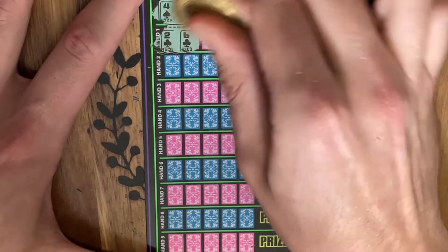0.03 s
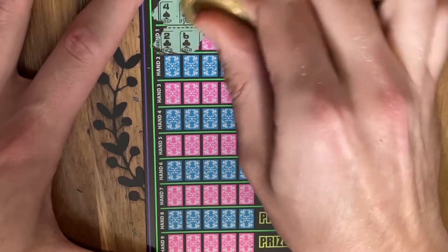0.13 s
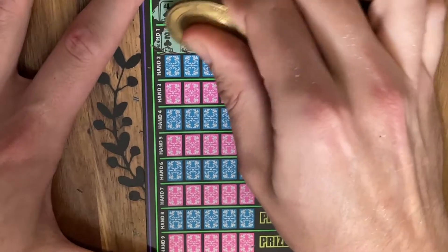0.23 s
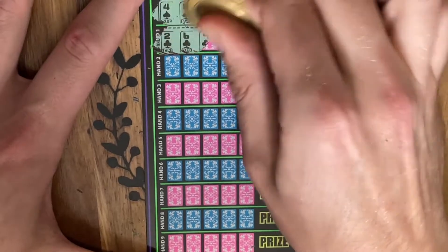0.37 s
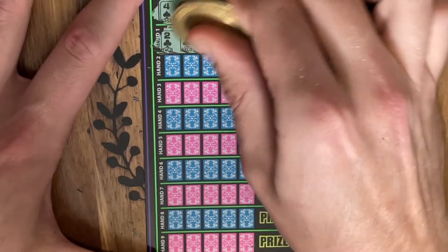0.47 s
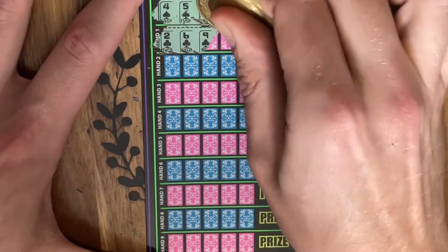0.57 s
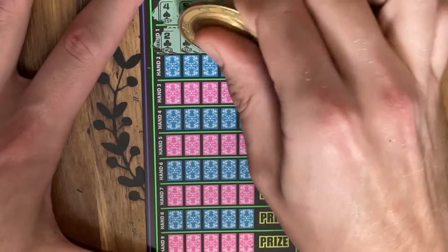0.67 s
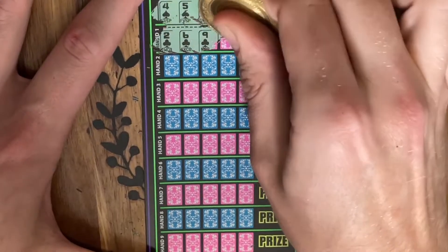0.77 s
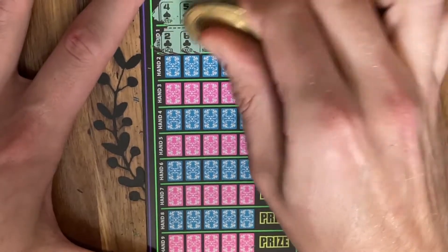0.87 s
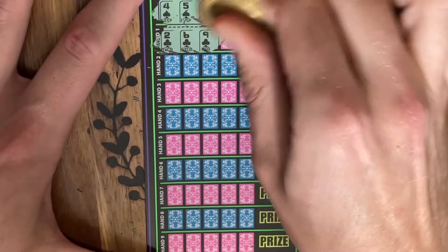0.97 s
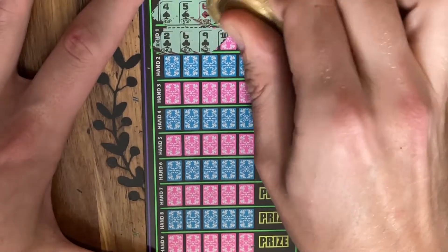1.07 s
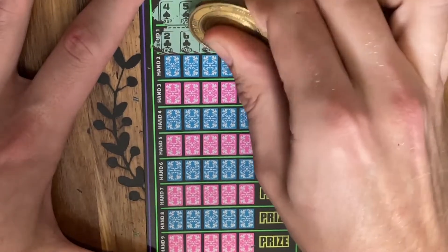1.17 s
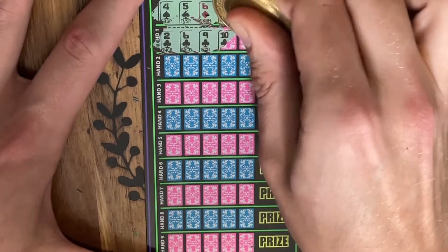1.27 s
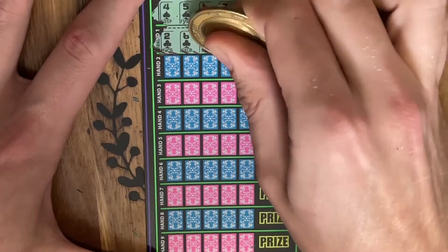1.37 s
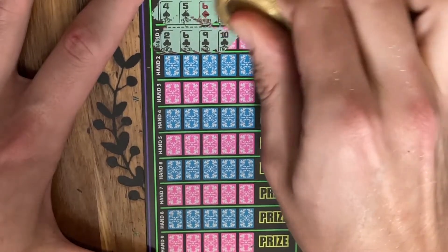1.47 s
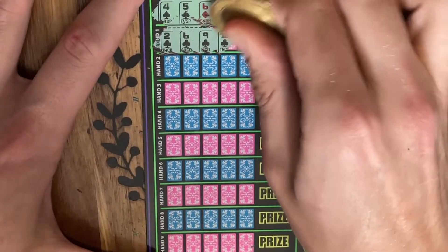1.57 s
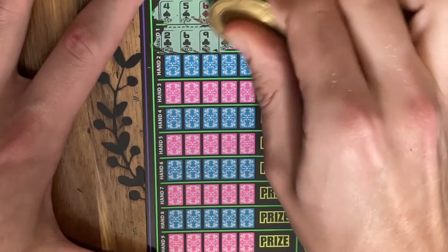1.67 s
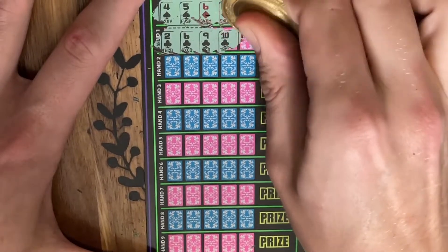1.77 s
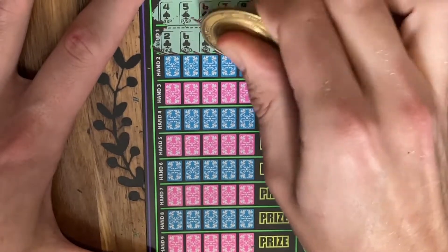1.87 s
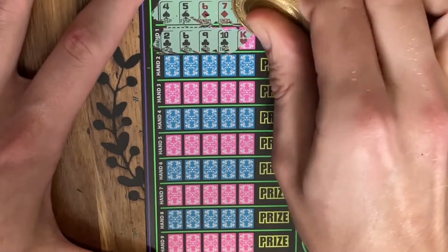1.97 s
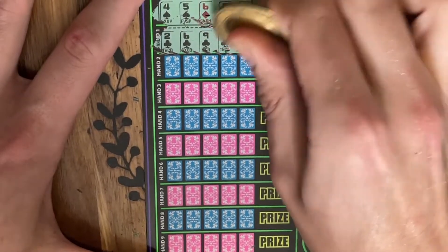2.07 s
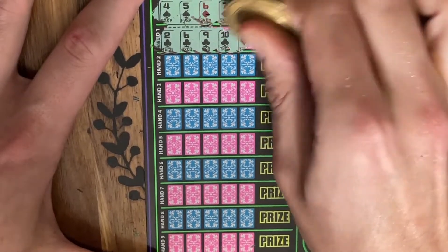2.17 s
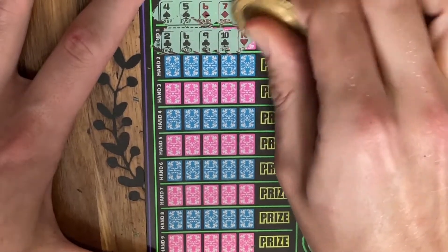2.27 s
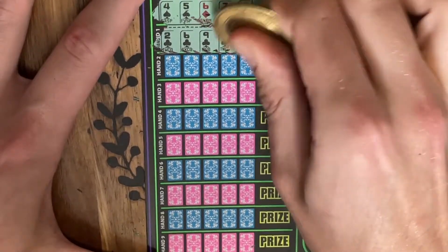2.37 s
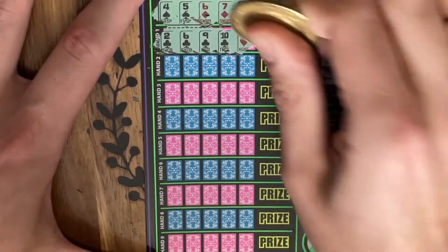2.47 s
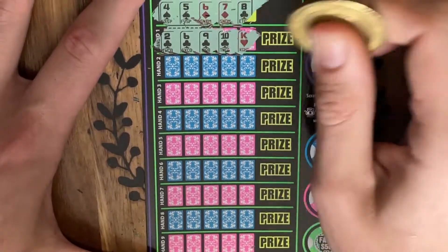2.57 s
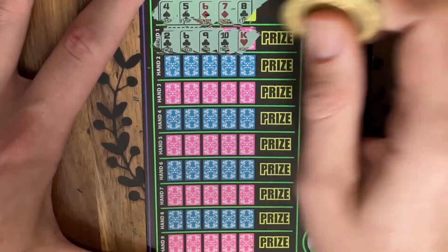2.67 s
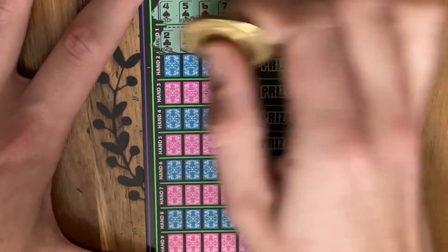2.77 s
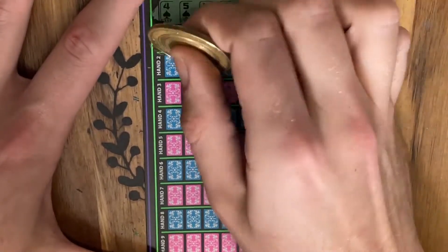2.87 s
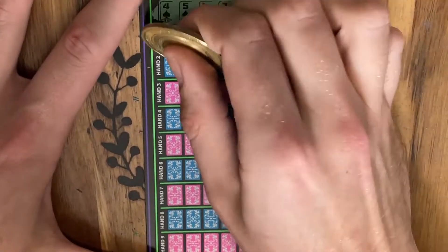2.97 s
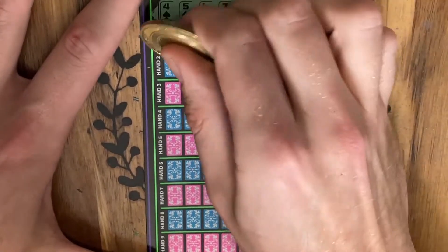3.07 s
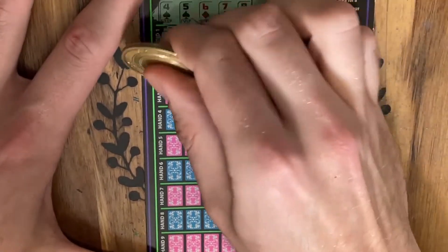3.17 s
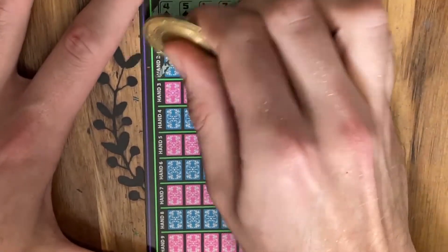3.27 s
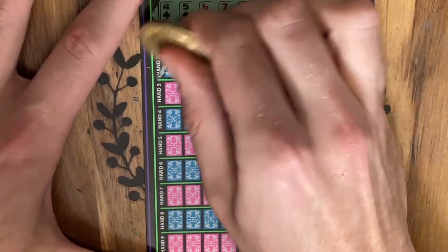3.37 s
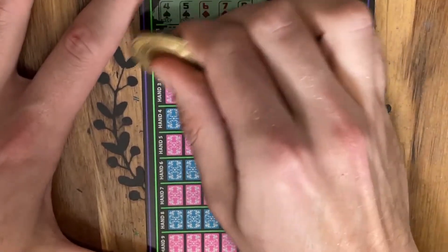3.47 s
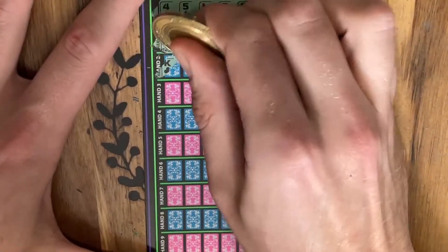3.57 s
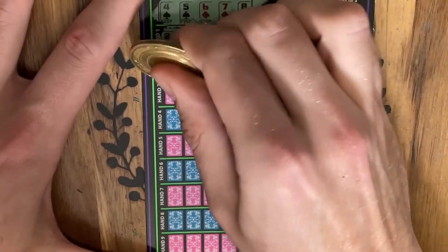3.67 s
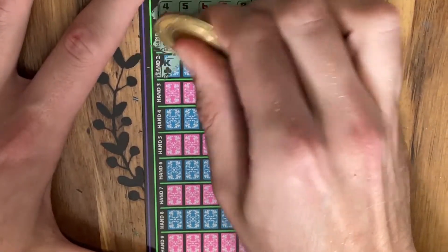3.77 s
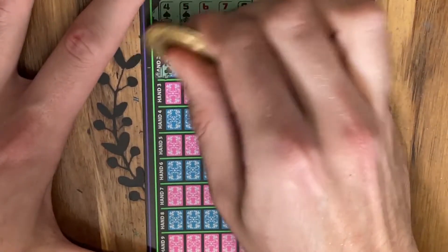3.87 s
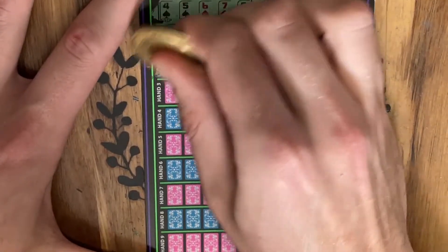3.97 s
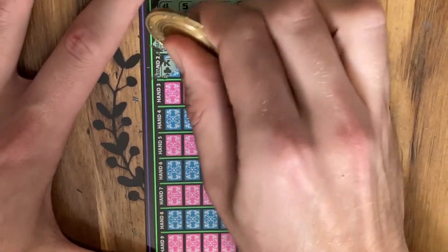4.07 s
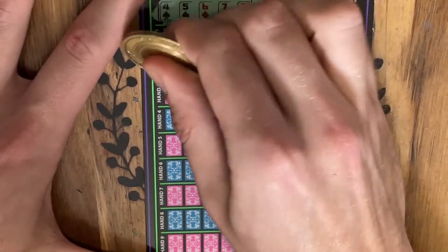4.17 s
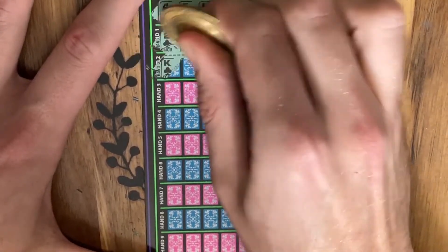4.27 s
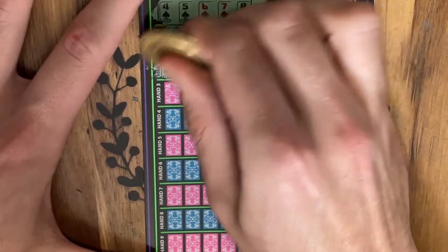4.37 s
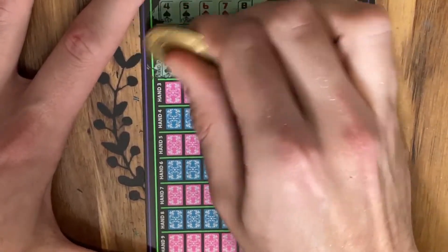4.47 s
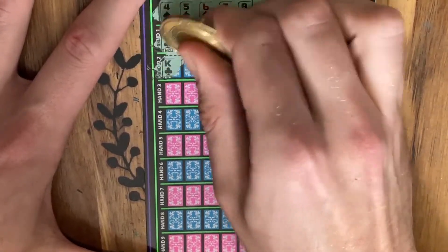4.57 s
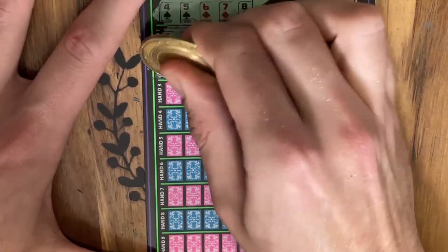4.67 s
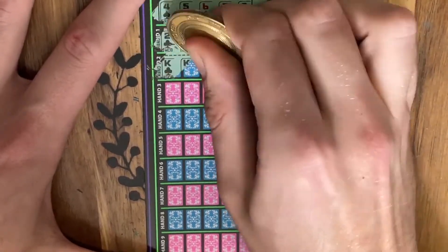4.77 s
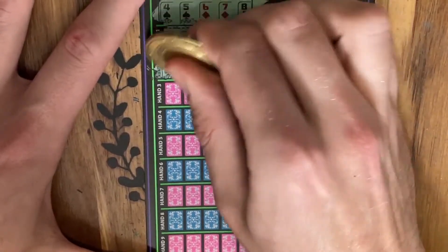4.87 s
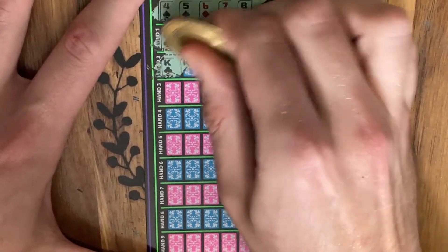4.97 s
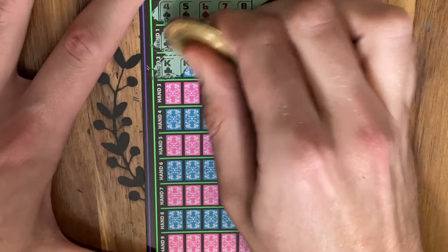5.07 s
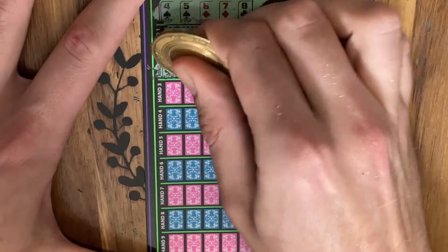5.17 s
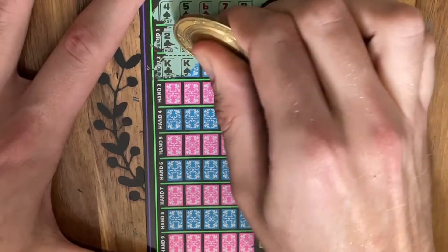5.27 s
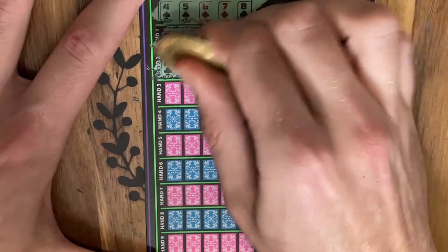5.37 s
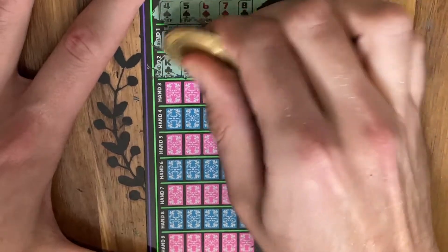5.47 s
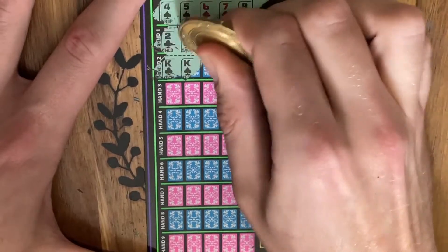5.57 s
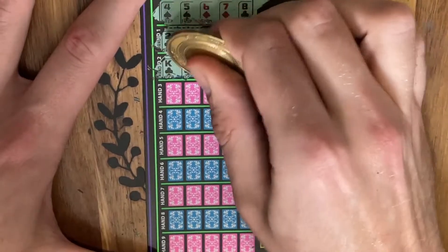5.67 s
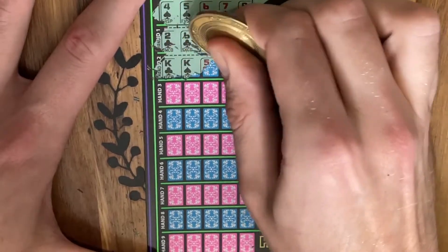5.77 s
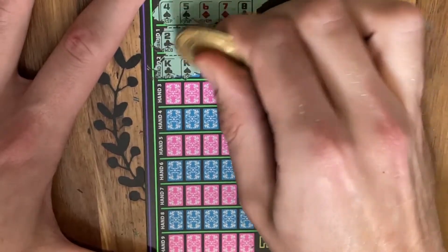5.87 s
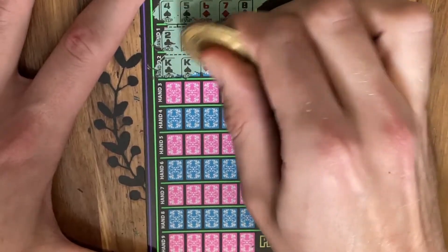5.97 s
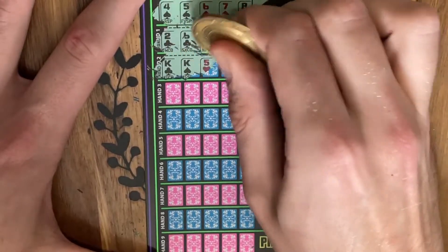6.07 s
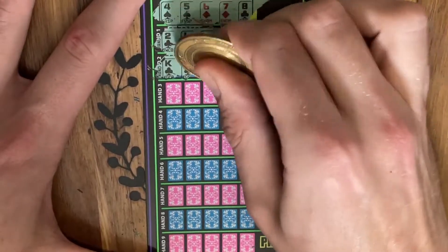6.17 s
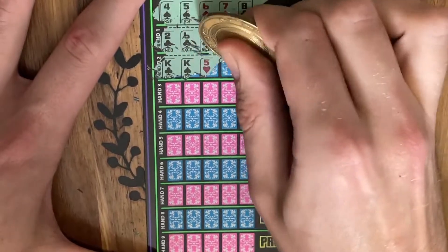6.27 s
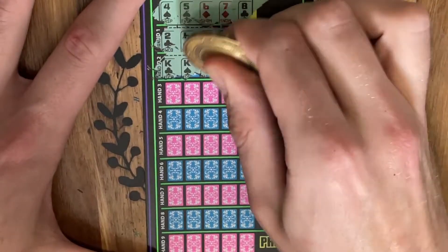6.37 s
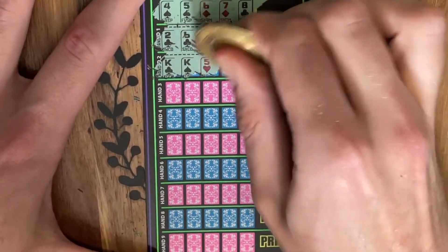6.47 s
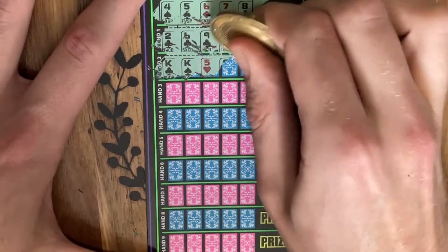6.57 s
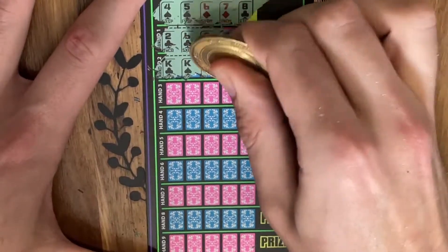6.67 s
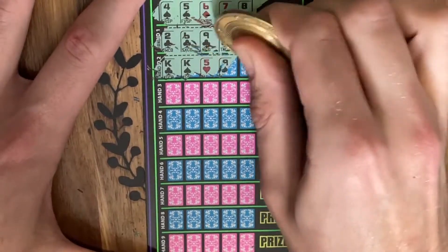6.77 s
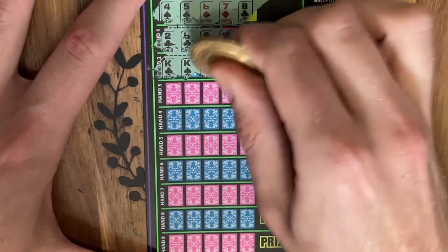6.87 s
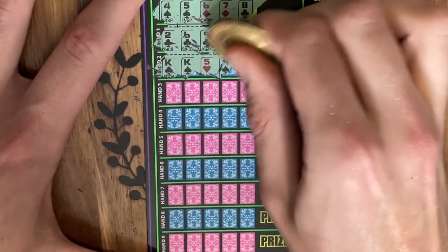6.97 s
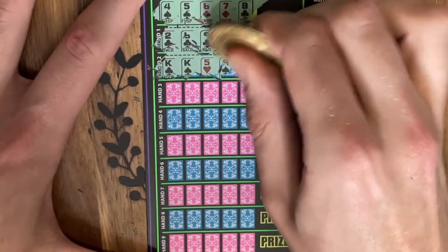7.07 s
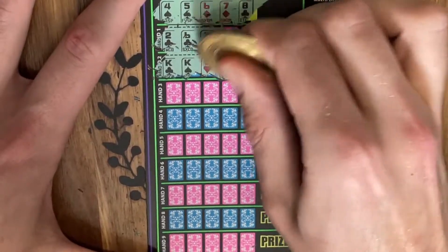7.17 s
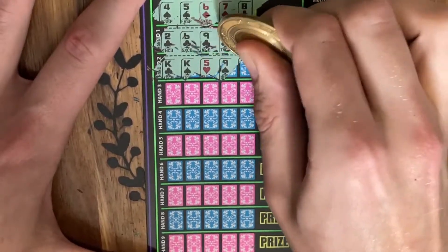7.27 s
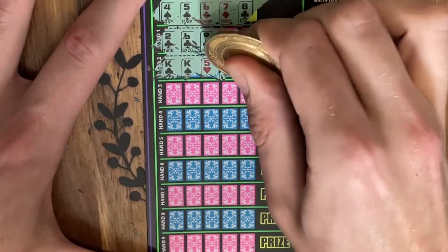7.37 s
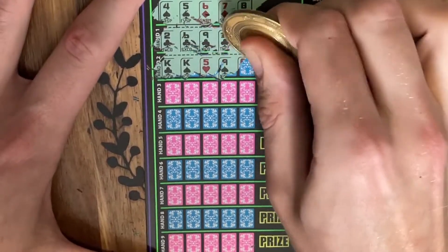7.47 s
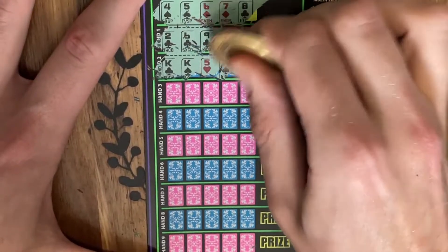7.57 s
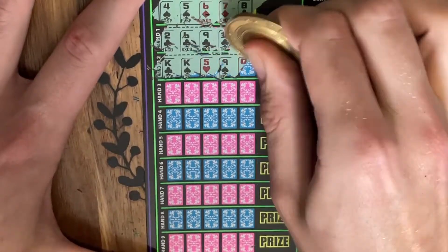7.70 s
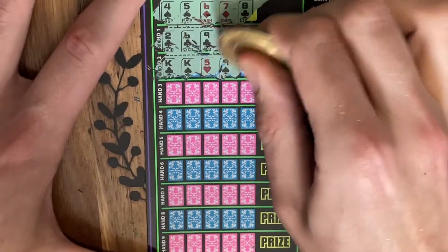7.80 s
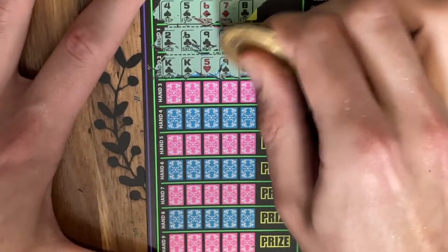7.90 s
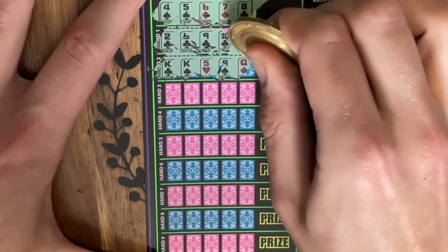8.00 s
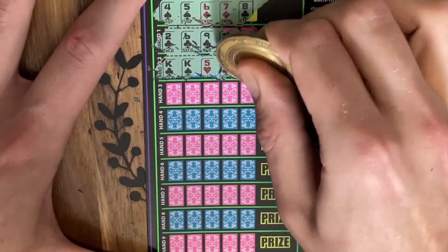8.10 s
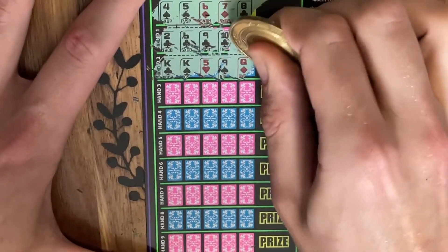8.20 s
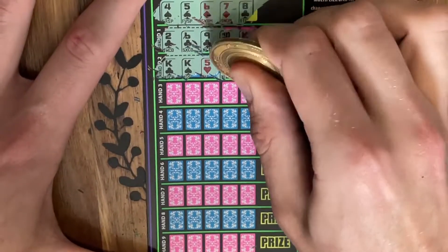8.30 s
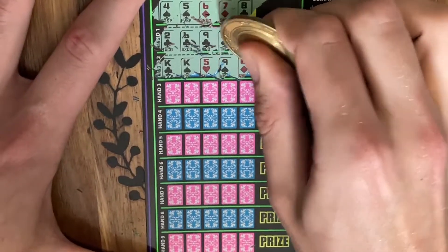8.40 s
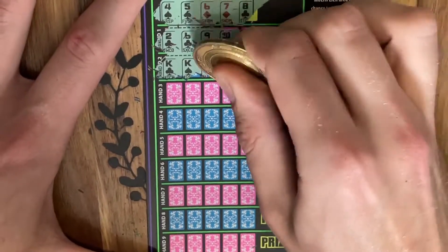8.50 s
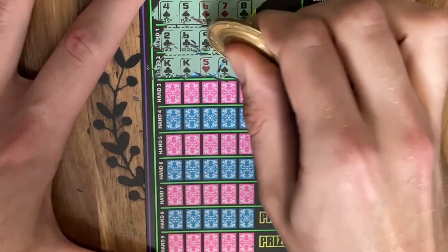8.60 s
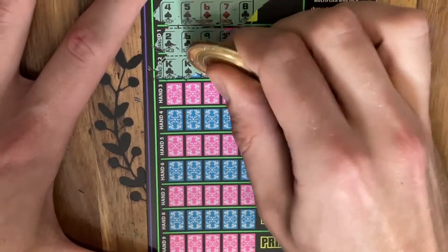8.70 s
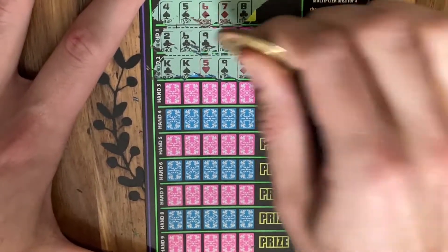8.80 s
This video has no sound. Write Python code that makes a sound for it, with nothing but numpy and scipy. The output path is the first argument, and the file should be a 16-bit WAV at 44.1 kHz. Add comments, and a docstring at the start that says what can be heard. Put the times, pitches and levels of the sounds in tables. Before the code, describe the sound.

Rapid to-and-fro coin scraping on card, about eight rasps a second, broken by a short pause with sharp ticks and a soft thud.

```python
"""A coin scratches the coating off a paper ticket on a wooden table, eight strokes a second, to and fro.
Random breaks stand for tiny flakes; this one force, with chatter and snags, rings table, coin and card.
The hand pauses once, sets the coin down and goes on; ticks of the rim are short cracks with a rustle.
Faint brushes and squeaks, a rumble from the hand, a short room tail and a steady hush lie around it,
all filtered noise, heard close by at two microphone ports in a quiet room."""
import sys
import numpy as np
from scipy import signal
from scipy.fft import rfft, irfft, next_fast_len
from scipy.io import wavfile
from scipy.ndimage import map_coordinates

SR = 44100
rng = np.random.default_rng(int(sys.argv[2]) if len(sys.argv) > 2 else 0)


def to_wav(s):
    """Save 16-bit WAV."""
    ch = np.atleast_2d(s).T  # columns
    pcm = np.round(np.clip(ch, -1, 1) * 32767)  # PCM
    wavfile.write(sys.argv[1], SR, pcm.astype(np.int16))


N = 389844  # samples in the whole scene
SIZE = 16384  # samples in one short event
T, HZ = np.arange(SIZE) / SR, np.fft.rfftfreq(SIZE, 1 / SR)

# tone of the card's rasp, one list for forth and one for back: (f/Hz, level/dB)
RASP_TONE = [
    [(700, -19), (1500, -13.5), (1800, -2.5), (2400, 1), (2780, -4), (3050, 4.5), (3350, -3.5),
     (3950, -7.5), (5500, -5), (6200, -10.5), (6700, -7.5), (7600, -7), (9000, -24), (14000, -45.5)],
    [(700, -14.5), (1500, -4.5), (1780, -1.5), (2400, 0.5), (2780, -5.5), (3100, -2.5), (3900, -7),
     (4350, -4.5), (4680, 3.5), (5000, -0.5), (6200, -6), (6700, -9), (9000, -16.5), (14000, -76.5)],
]
# tone of the crumbling coating: (f/Hz, level/dB)
FIZZ_TONE = [(6000, -22), (7900, -3.5), (8250, 2), (8700, -1), (9500, -5), (10250, 1), (10750, -6),
             (11300, -12), (11800, -6.5), (12600, -27), (14000, -36)]


def amp(db):
    """Turn decibels into a gain."""
    return 10 ** (np.asarray(db) / 20)


def unit(x):
    """Scale a sound to an rms of 1."""
    return x / np.sqrt(np.mean(x ** 2) + 1e-20)


def along(points, hz):
    """Read (f/Hz, value) points in between, on a log frequency axis."""
    f, v = np.transpose(points)
    return np.interp(np.log(hz + 1), np.log(f + 1), v)


def wobble(rate):
    """A smooth random curve as long as one event, with rate knots a second."""
    return map_coordinates(rng.standard_normal(SIZE // 8), [T * rate], mode="wrap")


def colour(points):
    """Response with the gain of the (f/Hz, level/dB) points that never sounds before its cause."""
    cepstrum = irfft(np.log(amp(along(points, HZ))))
    # folding the second half onto the first makes the response causal
    cepstrum[1:SIZE // 2] *= 2
    cepstrum[SIZE // 2 + 1:] = 0
    return np.exp(rfft(cepstrum))


def modes(rows):
    """Response of a body that rings at several resonances: (f/Hz, width/Hz, level/dB)."""
    total = 0
    for k, (centre, width, db) in enumerate(rows):
        damping = 1j * HZ * width
        sign = (-1) ** k  # neighbours take opposite signs
        total = total + sign * amp(db) * damping / (centre * centre - HZ * HZ + damping)
    return total


def through(force, response):
    """Play a short force through a body."""
    return irfft(rfft(force) * response)


def filtered(x, response):
    """Filter a whole track with a function of frequency."""
    m = next_fast_len(N + SR // 2)
    spectrum = rfft(x, m) * response(np.fft.rfftfreq(m, 1 / SR))
    return irfft(spectrum, m)[..., :N]


def add(track, s, sound):
    """Mix a sound into the track at time s, cutting off what falls outside."""
    i = round(s * SR)
    sound = sound[..., max(-i, 0):max(N - i, 0)]
    track[..., max(i, 0):][..., :sound.shape[-1]] += sound


def ports(x):
    """Shift the phase between the ports by pitch: over most of the treble the left port leads."""
    # head start of the left port, negative where it lags: (f/Hz, phase/rad)
    lead = [(0, 0), (300, 0), (520, -.4), (1400, -.15), (2700, .7), (4050, .7), (4650, 1.9), (5170, 4.9),
            (5700, 6.2), (6200, 6.5), (8350, 9), (9560, 9.6), (12300, 12.6)]
    return filtered(x, lambda hz: np.exp(1j * np.outer([.5, -.5], along(lead, hz))))


def air():
    """Steady hush of the room: coloured noise, mostly shared by both ports."""
    # tone of the hush: (f/Hz, level/dB)
    hush_tone = [(12, -33), (20, -16), (71, 0), (166, -18.5), (195, -7), (235, -5.5), (277, -18.5),
                 (439, -25), (517, -21.5), (819, -28), (1800, -32), (4770, -34.5), (13000, -40),
                 (16900, -89.5), (22000, -120)]
    # noise of each port alone, against the shared noise: (f/Hz, level/dB)
    apart = [(30, -23.5), (100, -16), (400, 0.5), (3000, -7), (12000, -7)]
    hush_db = -71.5
    shared = ports(rng.standard_normal(N))
    alone = filtered(rng.standard_normal((2, N)), lambda hz: amp(along(apart, hz)))
    return amp(hush_db) * unit(filtered(shared + alone, lambda hz: amp(along(hush_tone, hz))))


def room(x):
    """A short diffuse tail of fading noise, different at each port, where each pitch has its own decay."""
    # time to fade by 60 dB: (f/Hz, t/s)
    decay = [(200, 0.56), (1200, 0.37), (5000, 0.069), (12000, 0.051)]
    # strength of the tail: (f/Hz, level/dB)
    wet_level = [(200, -10.5), (1300, -23), (4000, -10.5), (12000, -20)]
    hz, t, z = signal.stft(rng.standard_normal((2, SR // 3)), SR, nperseg=256)
    fade = amp(-60 * t / along(decay, hz)[:, None])
    tail = signal.istft(z * fade, SR, nperseg=256)[1]
    wet = signal.fftconvolve(x[None], tail / np.linalg.norm(tail[0]), axes=1)[:, :N]
    return filtered(wet, lambda hz: amp(along(wet_level, hz)))


def hand():
    """The rocking hand makes the table rumble: low noise that swells and sinks."""
    # tone of the rumble: (f/Hz, level/dB)
    rumble_tone = [(20, -19), (60, -9.5), (92, 3), (135, -1.5), (250, -9.5), (400, -7.5), (900, -48)]
    # loudness of the rumble: (t/s, level/dB)
    rumble_level = [(0.0, -66.5), (1.08, -68), (1.92, -70), (2.11, -59.5), (2.26, -72), (2.31, -62.5),
                    (2.8, -79.5), (3.67, -60.5), (4.31, -68.5), (4.38, -58.5), (4.46, -71), (4.7, -67.5),
                    (6.8, -70.5), (6.89, -58), (6.97, -67), (8.17, -66.5), (8.49, -61.5), (8.84, -77)]
    rumble = unit(filtered(rng.standard_normal(N), lambda hz: amp(along(rumble_tone, hz))))
    return rumble * amp(np.interp(np.arange(N) / SR, *np.transpose(rumble_level)))


def squeaks():
    """A fingertip slipping on the card excites one narrow resonance."""
    # faint squeaks: (middle t/s, width t/s, f/Hz, level/dB)
    slips = [(3.062, .025, 2230, -84), (7.522, 0.02, 2070, -65)]
    out, lead_in = np.zeros(N), .1  # s
    for s, width, hz, db in slips:
        tone = unit(through(rng.standard_normal(SIZE), modes([(hz, 260, 0)]) ** 2))
        swell = np.exp(-((T - lead_in) / width) ** 2)
        add(out, s - lead_in, amp(db) * tone * swell)
    return out


def taps():
    """Sharp ticks of the rim with a short rustle of card, and the soft thud with which the coin lands."""
    # light taps of coin and card: (t/s, level/dB)
    ticks = [(2.4545, -43), (2.815, -47), (2.9605, -56), (2.9794, -32.5), (3.5634, -46), (3.8633, -52),
             (3.9673, -49), (4.061, -39), (4.079, -46), (4.2787, -40.5), (6.5373, -29), (8.107, -45),
             (8.136, -40), (8.4346, -40.5), (8.6316, -44)]
    # the coin is pressed down on the table: (t/s, level/dB)
    landings = [(2.984, -41)]
    # tone of the rim's click: (f/Hz, level/dB)
    click_tone = [(200, -24), (1500, 3), (4000, 3.5), (7000, 18), (10000, 19.5), (14000, -15)]
    # tone of the thud: (f/Hz, level/dB)
    thud_tone = [(40, -20.5), (120, -3), (330, 5), (800, 1), (1400, -8), (3000, -24.5)]
    out = np.zeros(N)
    for s, db in ticks:
        crack = through(rng.standard_normal(SIZE) * amp(-60 * T / .005), colour(click_tone))
        rustle_body = colour(FIZZ_TONE) + 0.41 * colour(RASP_TONE[0])
        rustle = through(rng.standard_normal(SIZE) * amp(-60 * T / 0.088), rustle_body)
        tick = crack / np.abs(crack).max() + amp(-16.5) * rustle / np.abs(rustle).max()
        add(out, s, amp(db) * tick)
    for s, db in landings:
        fade = amp(-60 * T / .035) + amp(-5.5) * amp(-60 * T / 0.2)  # a quick and a slow part
        thud = through(rng.standard_normal(SIZE) * fade, colour(thud_tone))
        add(out, s, amp(db) * thud / np.abs(thud).max())
    return out


def slide(t, length, rise, fall, arch_db):
    """Force over one stroke: it sets in, arches with the speed of the coin and lets go."""
    gate = (1 + np.tanh(t / rise)) * (1 + np.tanh((length - t) / fall)) / 4
    return gate * amp(-arch_db * np.minimum((2 * t / length - 1) ** 2, 2))


def flakes(rate, spread_db, smooth):
    """Tiny breaks of uneven size, rate a second, over the smooth hiss of sliding."""
    happens = rng.random(SIZE) < rate / SR
    size = rng.standard_normal(SIZE) * amp(spread_db * (2 * rng.random(SIZE) - 1))
    return unit(happens * size) + smooth * rng.standard_normal(SIZE)


def brushes():
    """With no weight on it the lifted coin stirs only the surface of the card."""
    # light touches: (start t/s, end t/s, level/dB)
    touches = [(2.558, 2.592, -69.5), (2.768, 2.826, -62.5), (8.805, 8.843, -69)]
    out, lead_in = np.zeros(N), .05  # s
    card = colour(RASP_TONE[1]) * (1 + modes([(7050, 760, 1.5)])) + 0.88 * colour(FIZZ_TONE)
    for start, end, db in touches:
        hiss = unit(through(flakes(rate=3000, spread_db=4, smooth=.4), card))
        touch = slide(T - lead_in, end - start, rise=0.0042, fall=0.012, arch_db=3)
        add(out, start - lead_in, amp(db) * hiss * touch)
    return out


def reflections(t60):
    """Response of a brief cluster of reflections, of unit energy."""
    cluster = rng.standard_normal(SIZE) * amp(-60 * T / t60) * (1 - np.exp(-T / 0.00033))
    return rfft(cluster / np.linalg.norm(cluster))


def snagging(t, start, length):
    """The edge catches and tears free: short bumps of extra force."""
    # snags, with the extra force before each body takes its share: (t/s, level/dB)
    catches = [(0.503, 7), (.538, 11.5), (1.263, 16.5), (1.847, 5), (1.961, 8), (1.974, 14.5), (2.081, 9),
               (2.207, 7), (3.794, 7), (3.889, 9), (4.029, 14), (4.277, 15), (4.506, 4), (4.766, 7.5),
               (6.536, 13.5), (6.993, 9.5), (7.483, 17.5)]
    gain = 1
    for s, db in catches:
        if abs(s - start) < length * 2:
            gain = gain + (amp(db) - 1) * np.exp(-((t + start - s) / 0.0028) ** 2)
    return gain


def cushion():
    """The paper softens the force on the heavy bodies, table and coin."""
    return 1 / (1 + 1j * HZ / 5000) ** 2


def coin_body():
    """Coin pinched in the fingers: the grip, and so each resonance, shifts a little every stroke."""
    # resonances of the held coin: (f/Hz, width/Hz, level/dB)
    coin_modes = [(1171.4, 59, -9.5), (1349.4, 99, 0), (1455.5, 116, 0), (1554, 136, -6)]
    grip = 1 + 0.014 * rng.standard_normal(len(coin_modes))
    return cushion() * modes([(hz * g, w, db) for (hz, w, db), g in zip(coin_modes, grip)])


def table_body(boom_db):
    """Table top: a slow swing and higher modes, favoured differently at each spot."""
    # slower swing, before the boom gain: (f/Hz, width/Hz, level/dB)
    boom_modes = [(318.7, 53, -4.5), (397.5, 56, -4), (468, 43, -8.5)]
    # higher modes: (f/Hz, width/Hz, level/dB)
    top_modes = [(601, 45.3, -3.5), (804, 44, 3), (905, 94, -4.5), (1040, 73, -3.5)]
    spot_db = 2.5  # typical random change of each mode
    top = [(hz, w, db + boom_db) for hz, w, db in boom_modes] + top_modes
    return cushion() * modes([(hz, w, db + spot_db * rng.standard_normal()) for hz, w, db in top])


def edge_ring(back, right):
    """Resonance of the coin's edge, blended from the left to the right end of a row."""
    # each pair is (forth, back)
    left_hz, right_hz = (5430, 5600), (6420, 6780)
    left_db, right_db = (8, -10), (16, 7.5)
    tilt = 1 + 0.037 * rng.standard_normal()  # the ring shifts from stroke to stroke
    at_left = modes([(left_hz[back] * tilt, 550, left_db[back])])
    at_right = modes([(right_hz[back] * tilt, 550, right_db[back])])
    return (1 - right) * at_left + right * at_right


def scratching():
    """Every stroke drives table, coin and card with the same stream of breaking flakes."""
    # strokes, forth and back in turn, with the rasp's level and the growth of the pressure:
    # (start t/s, end t/s, level/dB, growth/dB)
    strokes = [(.018, .081, -49, 4), (.146, .2, -51, -0.5), (.256, .319, -50.5, 0), (.378, .434, -56, 3),
               (.476, .545, -51.5, -4.5), (.607, .661, -52.5, 0), (.719, .787, -52, -0.5),
               (.85, .902, -53, -3), (.953, 1.024, -50.5, 4.5), (1.092, 1.152, -53.5, -0.5),
               (1.207, 1.26, -52, 4.5), (1.325, 1.386, -52, 1), (1.435, 1.497, -49.5, 2.5),
               (1.569, 1.62, -54, -4), (1.682, 1.737, -52.5, 0), (1.803, 1.865, -52, 0),
               (1.912, 1.97, -47, 0), (2.043, 2.104, -50.5, 0), (2.158, 2.223, -52, 0),
               (2.287, 2.339, -52, 0), (2.384, 2.433, -70.5, -4), (3.103, 3.171, -52.5, -3.5),
               (3.235, 3.299, -51.5, -6.5), (3.375, 3.433, -55.5, -3.5), (3.483, 3.542, -48.5, 3),
               (3.608, 3.679, -52.5, -3), (3.729, 3.805, -51, -3.5), (3.858, 3.917, -61, 3.5),
               (3.971, 4.043, -53.5, -4), (4.112, 4.167, -51.5, 1), (4.225, 4.298, -63, -2),
               (4.348, 4.407, -55, 2), (4.467, 4.541, -51.5, 1), (4.602, 4.653, -52, -0.5),
               (4.715, 4.775, -49.5, 6), (4.838, 4.898, -52.5, -1), (4.954, 5.019, -53, -1),
               (5.078, 5.136, -54.5, 0.5), (5.205, 5.285, -53, 0), (5.354, 5.407, -50.5, -2),
               (5.469, 5.542, -52, 0), (5.603, 5.662, -54.5, -6), (5.72, 5.785, -53, 4.5),
               (5.848, 5.913, -56, 1.5), (5.974, 6.038, -51, 0), (6.086, 6.162, -55, 1),
               (6.217, 6.287, -51.5, -4), (6.343, 6.404, -53, -4.5), (6.462, 6.548, -50, 0),
               (6.593, 6.662, -49, -3), (6.721, 6.784, -51, -1.5), (6.844, 6.9, -49.5, 1.5),
               (6.956, 7.012, -51.5, 1), (7.076, 7.138, -52.5, -0.5), (7.195, 7.256, -50, -5.5),
               (7.315, 7.372, -55, -1.5), (7.43, 7.492, -51.5, -6.5), (7.549, 7.619, -53, 2.5),
               (7.679, 7.731, -48.5, -2.5), (7.798, 7.858, -51.5, -1), (7.911, 7.966, -50, 2),
               (8.035, 8.088, -51.5, 1.5), (8.145, 8.193, -52.5, 2.5), (8.262, 8.329, -60, -3),
               (8.368, 8.415, -72, -2), (8.461, 8.531, -60, -3), (8.571, 8.613, -68.5, 0),
               (8.675, 8.721, -54, -6.5)]
    # place along a row of the ticket: (t/s, place from 0 left end to 1 right end)
    across = [(0, 0), (1.2, 0.35), (1.9, 0.76), (2.6, 0.68), (3, 0), (4.6, 0.071), (6.9, 0.34), (7.3, 0.93),
              (8.8, 0.82)]
    # base levels at the usual bite, a row each for upper and lower ticket row: (forth level/dB, back level/dB)
    table_base = [(-59.5, -55.5), (-55.5, -51.5)]
    coin_base = [(-47, -52), (-50, -52)]
    usual_bite_db, next_row_s = -52, 2.9
    # dB that the heavy bodies gain for each dB of bite: (forth, back)
    table_follows, coin_follows = (0.39, 0.042), (0.72, 0.46)
    # boom over the rest of the table, [upper row, lower row] of (forth, back); its gain at the right end
    boom_base_db, boom_across_db = [(-4.5, -2.5), (-9, -3.5)], 3.5
    # fizz over the rasp (forth, back); its change at the right end
    fizz_base_db, fizz_across_db = (-4.8, -4), -5
    loose_s, loose_db_per_s = 8.35, -17  # from here on the grip loosens and the coin rings less

    out, lead_in = np.zeros((2, N)), .05  # s
    rasps, crumble = [colour(points) for points in RASP_TONE], colour(FIZZ_TONE)
    for k, (start, end, rasp_db, lean_db) in enumerate(strokes):
        t, length = T - lead_in, max(end - start, .02)
        back, row = k % 2, int(start > next_row_s)

        # going forth rings the coin, coming back shakes the table; a light stroke keeps more body than rasp
        extra_bite_db = rasp_db - usual_bite_db
        table_db = table_base[row][back] + table_follows[back] * extra_bite_db
        coin_db = coin_base[row][back] + coin_follows[back] * extra_bite_db
        coin_db += loose_db_per_s * max(start - loose_s, 0)

        # towards the right end of a row: more boom, less fizz and a higher ring of the edge
        right = np.clip(np.interp(start, *np.transpose(across)), 0, 1) ** 2
        boom_db = boom_base_db[row][back] + boom_across_db * right
        fizz_db = fizz_base_db[back] + fizz_across_db * right

        pressure = amp(lean_db * (t / length - .5).clip(-.5, .5))
        chatter = amp(1.32 * wobble(rate=111.8) + 1.3 * wobble(rate=480))
        force = flakes(rate=7500, spread_db=5, smooth=0.4) * pressure * chatter
        snag = snagging(t, start, length)

        # the edge bites at once going forth and glides in coming back; it rubs lightly while it turns round
        bite = (.003, .008)[back]  # s
        turn = slide(t - .002, length + 0.059, rise=0.027, fall=0.0088, arch_db=2)
        turn = turn * amp(-70 * (t - length).clip(0, .2))
        cut = slide(t - .001, length - .001, rise=bite, fall=0.011, arch_db=6) + amp(-21.5) * turn
        drag = slide(t + 0.0027, length + 0.002, rise=bite, fall=0.0068, arch_db=0.5) + amp(-16.5) * turn
        push = slide(t, length + 0.0011, rise=0.013, fall=0.016, arch_db=-1.0) + amp(-33) * turn

        # waves bounce in the card and off the hands: each spot has fine ridges, a little different at each port
        scatter = .3 * np.array([reflections(t60=.008) for port in range(2)])
        spot = 1 + 0.5 * reflections(t60=0.031) + scatter
        card = spot * rasps[back] * (1 + edge_ring(back, right))

        # (envelope, how strongly a snag jolts it, body, level/dB)
        layers = [(push, .8, table_body(boom_db), table_db),
                  (drag, 1, coin_body(), coin_db),
                  (cut, .6, card, rasp_db),
                  (cut, .6, spot * crumble, rasp_db + fizz_db)]
        inside = (t > 0) & (t < length)
        for envelope, jolt, body, db in layers:
            sound = through(force * envelope * snag ** jolt, body)
            # the level is set with the snags partly evened out, so that they stand out
            plain = (sound / snag ** (jolt / 2))[..., inside]
            add(out, start - lead_in, amp(db) * sound / np.sqrt(np.mean(plain ** 2)))
    return out


def scene():
    """Coin and card close by, their faint room tail, the rumble of the hand and the hush."""
    coin = scratching() + brushes() + taps() + squeaks()
    return ports(coin) + room(coin.mean(axis=0)) + hand() + air()


def record(dry):
    """The sound dulls above 12 kHz and stops at 14.2 kHz."""
    # gain in the highest treble: (f/Hz, level/dB)
    treble = [(12000, 0), (12700, -11), (13300, -5), (14200, -11)]
    top_hz = 14200
    return filtered(dry, lambda hz: amp(along(treble, hz)) * (hz < top_hz))


dry = scene()
out = record(dry)
to_wav(out)
```